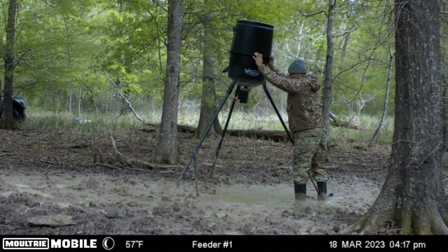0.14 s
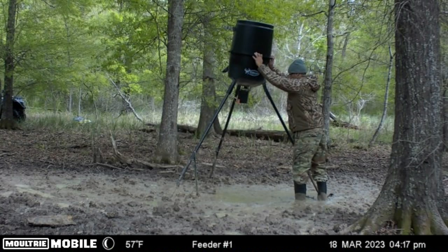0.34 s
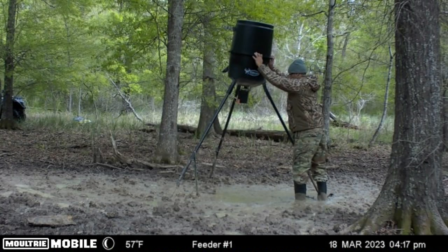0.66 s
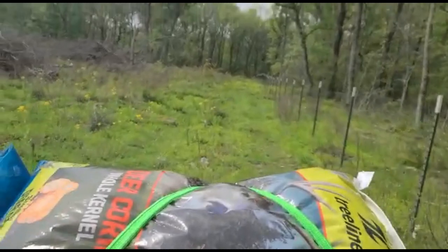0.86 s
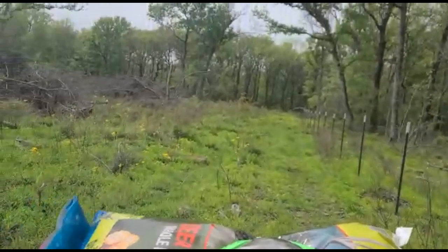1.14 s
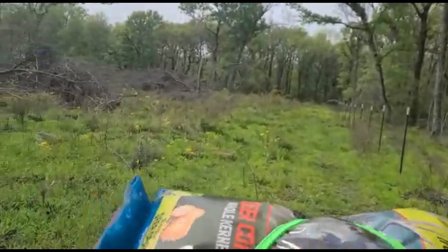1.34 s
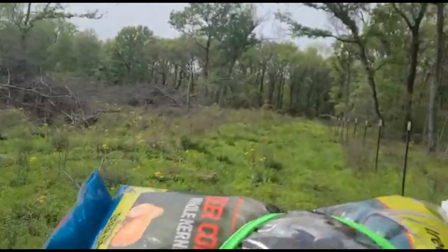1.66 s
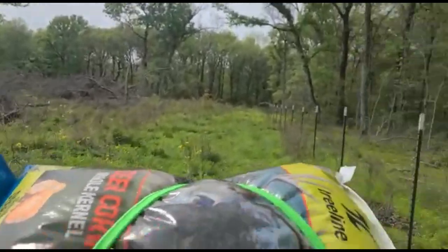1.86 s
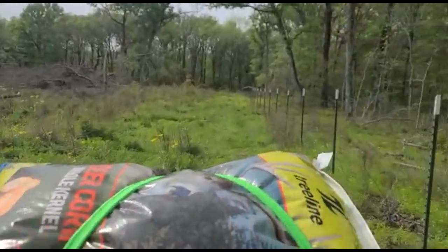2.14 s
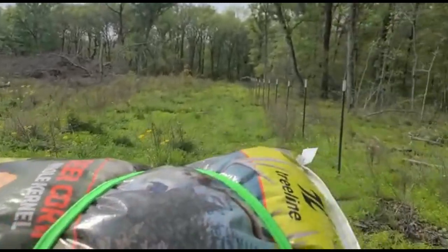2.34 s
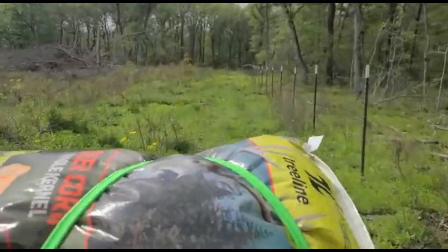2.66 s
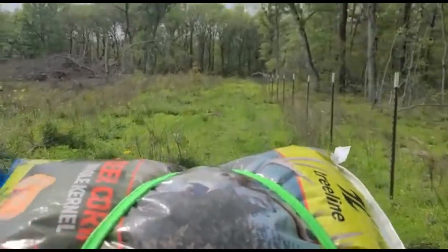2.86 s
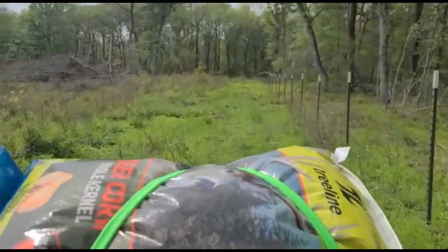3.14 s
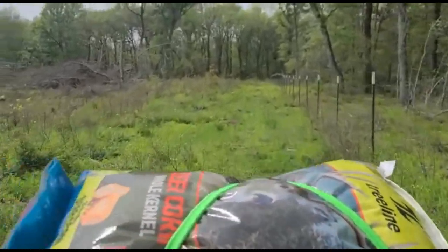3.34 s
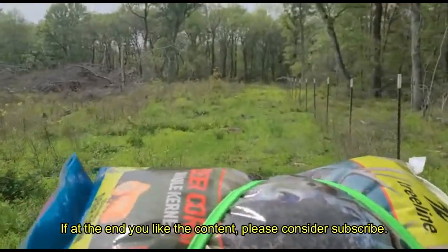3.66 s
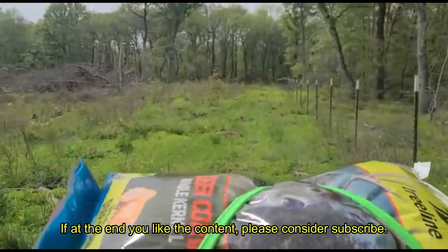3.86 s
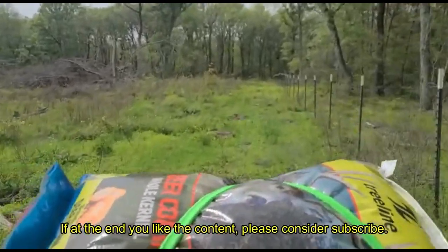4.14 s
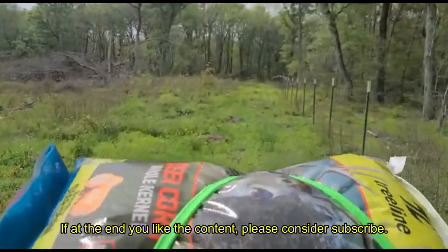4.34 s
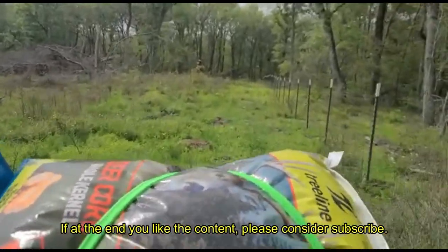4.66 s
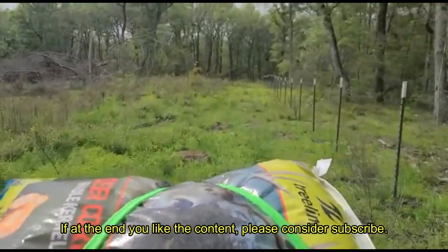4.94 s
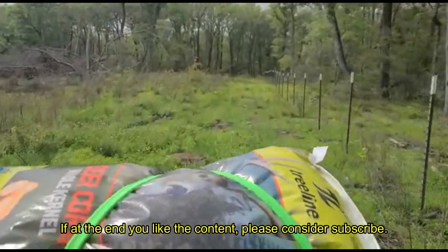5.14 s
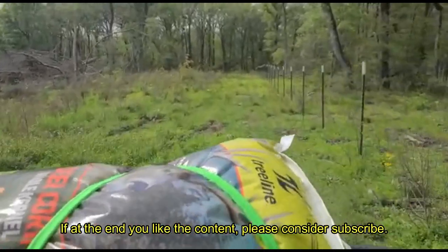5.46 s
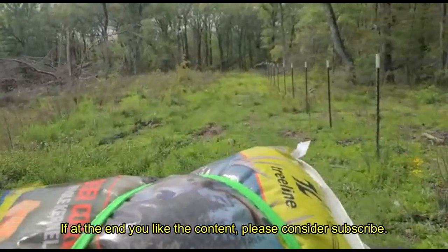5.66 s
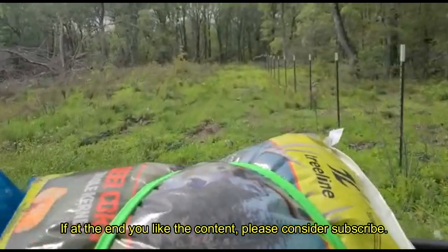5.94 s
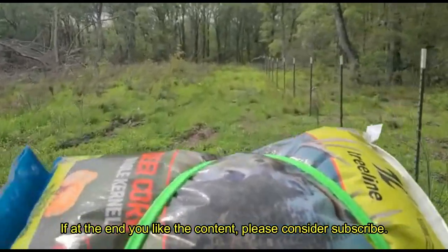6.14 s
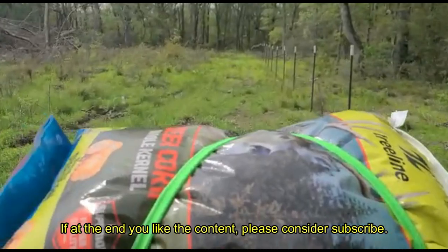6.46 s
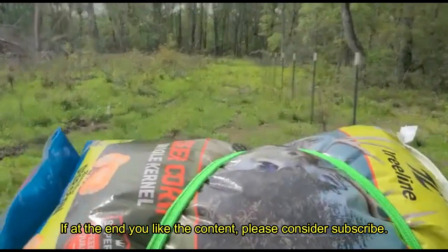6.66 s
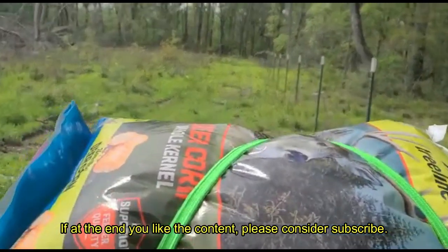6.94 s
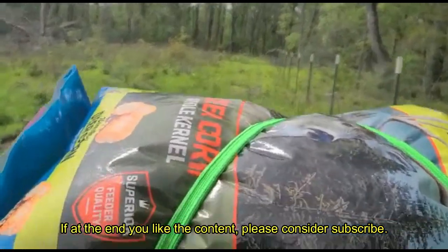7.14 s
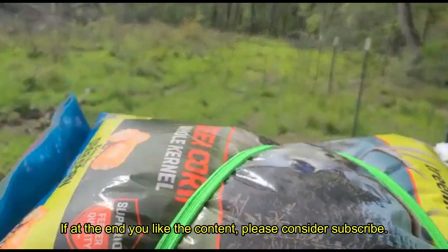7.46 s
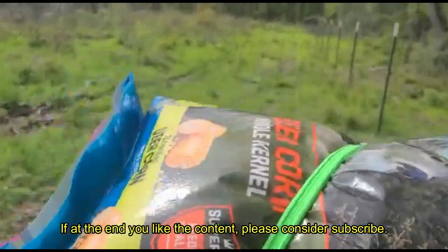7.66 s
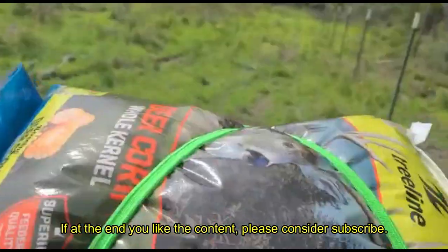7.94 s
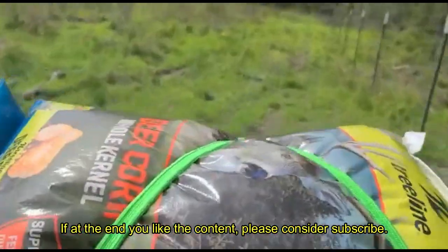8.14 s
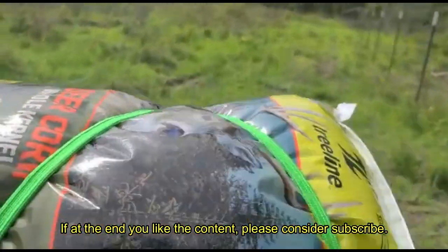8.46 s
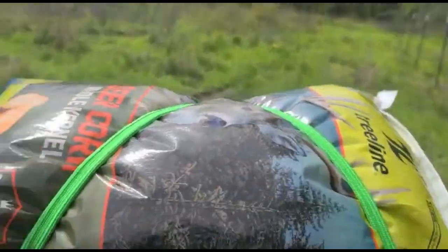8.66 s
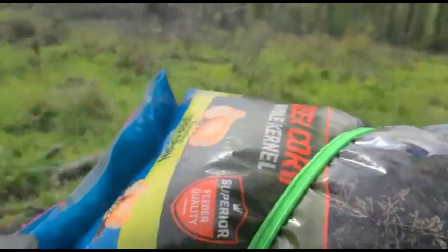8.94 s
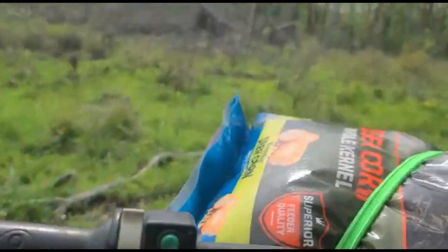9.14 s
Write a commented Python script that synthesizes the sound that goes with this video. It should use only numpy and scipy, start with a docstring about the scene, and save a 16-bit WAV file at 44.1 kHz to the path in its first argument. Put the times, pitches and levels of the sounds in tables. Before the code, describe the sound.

A brief silence is cut off by a steady two-cylinder motor driving slowly across a grassy field. The fast, deep exhaust putter flutters unevenly under mechanical rattle and soft hiss, holding almost constant speed. Muffled frame thuds come at intervals, with tiny plastic snaps early and late and one faint scuff midway. Close, dry outdoor sound from the rider's position, with treble leaning right.

```python
"""First comes silence, then the steady rattle of a small two-cylinder off-road vehicle cuts in abruptly.
It rolls over a grassy field, heard from the seat. Two click trains, half a cycle apart, are shaped into
exhaust tones that waver one by one. Noise that swells once a cycle makes the clatter and hiss; one knock a
cycle rings the block, and narrow bands of noise make the gears whine. The load ticks and scuffs, and the
frame thuds over bumps: short bursts of noise."""
import sys
import numpy as np
from scipy import signal
from scipy.fft import rfft, irfft, next_fast_len
from scipy.io import wavfile
from scipy.ndimage import uniform_filter1d

SR = 44100
rng = np.random.default_rng(int(sys.argv[2]) if len(sys.argv) > 2 else 0)


def master(y):
    """Save y as 16-bit WAV."""
    cut = np.clip(np.atleast_2d(y).T, -1, 1)
    pcm = np.round(cut * 32767)  # scale
    wavfile.write(sys.argv[1], SR, pcm.astype(np.int16))


N = 410571

START_S, TOP_HZ = 0.7765, 15800  # end of the silence, upper limit of the sound
CYCLE_HZ = 37.2  # engine cycle rate that places the exhaust tone colour
TREMBLE_HZ, TREMBLE_TOP_HZ = .07, 9  # rms wander of the cycle rate, and its fastest rate
WAVER_TOP_HZ = 14  # fastest wavering of any level
RING_WAVER_DB, MACHINE_WAVER_DB = 1.5, 0.25  # rms: ring and whine; clatter and hiss
SWELL_SHARE = .2  # dB of swell near 75 Hz per dB of dropout near 225 Hz

# Tone colour of the exhaust: (multiple of the cycle rate, relative level [dB])
EXHAUST_TONES = [(1, -5), (2, 1), (3, -15), (4, 0), (5, -26), (6, -.5), (7, -13), (8, -3.5), (9, -13.5),
                 (10, -2.5), (11, -13.5), (12, -13), (13, -26), (14, -27), (15, -27), (16, -19),
                 (17, -21.5), (18, -19.5), (19, -22), (20, -22.5), (21, -25), (22, -26)]
# Colour of the clatter of block, gears and tyres: (frequency [Hz], relative level per Hz [dB])
CLATTER_COLOUR = [(25, -22.5), (60, -4.5), (130, -7), (250, -1), (480, -6), (800, -11), (1200, -13),
                  (1700, -16), (2300, -26), (3200, -29), (4000, -37), (5000, -41.5), (6000, -51.5),
                  (7000, -63)]
# Colour of the hiss: (frequency [Hz], relative level per Hz [dB])
HISS_COLOUR = [(5500, -31.5), (7200, -21), (8500, -5), (10000, -4), (11800, 0.5), (13000, -3.5),
               (15500, -4)]
# How far noise rises and falls around its middle in each cycle: (frequency [Hz], swing [dB])
THROB_SWING = [(300, 3), (650, -1.5), (1050, -1), (1600, 2.5), (2600, 0.6), (5000, 1.5), (11000, 2)]
# Resonances of the block, rung by the knock: (frequency [Hz], width [Hz], level before the ring level [dB])
BLOCK_RINGS = [(617, 130, -10), (1160, 190, -15), (1390.5, 83, -1), (1760, 220, -12)]
# Fuzzy gear whines: (frequency [Hz], width [Hz], level before the whine level [dB])
GEAR_WHINES = [(2795, 28, -4), (2870, 28, -6), (3093, 50, -9.5), (4950, 73, -21)]
# How alike the noise is on both sides: (frequency [Hz], likeness [0 to 1])
SIDE_LIKENESS = [(60, 0.93), (200, 0.84), (500, 0.6), (1200, 0.35), (2500, 0.3), (5000, 0.28), (15000, .2)]
# Loudness difference of the two sides: (frequency [Hz], left minus right [dB])
SIDE_LEVEL = [(60, -0.3), (150, 0.4), (380, -2), (950, -5.0), (2380, -9), (5980, -9.5), (15000, -9)]
# Phase difference of the two sides: (frequency [Hz], lead of the left [rad])
SIDE_PHASE = [(70, -0.05), (150, -0.28), (300, 0.8), (400, -1.28), (600, -1), (950, -2.5), (1380, -0.54),
              (2070, 1.36), (2840, -1.7), (5000, -1.6)]
# Ticks of the load: (time [s], gain above 8 kHz [dB], gain near 5 kHz [dB], body near 2 kHz [dB])
LOAD_TICKS = [(2.207, -38, -33, -27.5), (2.2244, -49, -50, -45.5), (2.277, -45, -48, -42),
              (2.3597, -52, -49, -42), (5.5991, -57, -54, -49), (7.3308, -54, -45, -45),
              (7.6917, -47, -44, -48), (7.711, -53, -52, -50.5), (7.7557, -48, -41, -41.5),
              (7.8193, -57, -58, -49), (7.9485, -48, -39, -46), (8.0012, -54, -53, -43)]
# One scuff of the load: (start [s], length [s], rub [dB], squeak frequency [Hz], squeak [dB])
LOAD_SCUFF = (4.232, .05, -59, 9400, -65)
# Thuds of the frame over bumps: (time [s], approximate peak [dB])
FRAME_THUDS = [(1.787, -21.5), (2.004, -26), (2.247, -27), (3.113, -27.5), (4.557, -23.5), (5.569, -38.5),
               (6.111, -22.5), (6.246, -14.5), (6.677, -30), (8.753, -27.5)]
# The silencer holds higher tones back longer: (lag per Hz [s], up to [Hz], turn of the pulse [rad])
SILENCER_LAG = (6.35e-5, 400, 1.8)
# Engine speed: (time [s], engine cycles per second [Hz])
ENGINE_SPEED = [(.78, 36.8), (1.0, 37.4), (1.29, 36.75), (1.49, 37.75), (1.73, 37.45), (1.94, 36.5),
                (2.13, 36.95), (2.5, 36.8), (2.72, 37.4), (2.87, 37.35), (3.0, 37.1), (3.23, 36.8),
                (3.47, 37.7), (3.6, 37.45), (3.9, 37.3), (4.35, 37.75), (4.62, 37.05), (4.8, 36.8),
                (5.12, 37.8), (5.33, 37.3), (5.45, 37.5), (5.87, 37.1), (6.0, 37.75), (6.15, 37.75),
                (6.43, 36.95), (6.55, 37.25), (6.84, 37.35), (6.94, 36.85), (7.17, 36.95), (7.38, 36.2),
                (7.6, 36.9), (7.8, 37.8), (8.03, 36.5), (8.36, 37.35), (8.51, 36.6), (8.62, 37.3),
                (9.0, 37.15), (9.1, 36.6), (9.31, 36.7)]
# Exhaust bands: (from [Hz], to [Hz], level [dB], rms waver [share of the tone])
EXHAUST_BANDS = [(0, 55, -36, .04), (55, 128, -28, 0.11), (136, 188, -29.5, 0.081), (190, 275, -30.5, 0.17),
                 (269, 316, -32, .12), (323.5, 353, -46, 0.19), (348, 465, -33, .12), (465, 5000, -45, .2)]
# Slow drift of the exhaust bands, near 37, 75, 150, 225, 300, 335, 370 and above 465 Hz:
# (time [s], then one change for each band [dB])
BAND_DRIFT = [(.8, 0, -0.71, 0, -1, -1, 0.5, -2.5, -1), (1.2, -.5, 1, -0.5, 0, 0, -6, 0, -2),
              (1.7, .3, 0, 1.6, 0.5, 0, -3, 0, 1.5), (2.3, 0.068, -0.66, -1.5, 0.5, -0.5, 6, 1, 2),
              (3, 0, -0.48, .8, 1, 0, -6, 2.5, 1), (3.7, .3, 0, 1, .3, -0.3, -7, 1, -2),
              (4.3, -0.34, -.3, 0.9, .5, .3, 0, 2.5, 0.5), (4.9, 0, -0.26, -0.5, 1, 0, 0, -0.5, 1),
              (5.3, 0, -.2, 0, -0.5, 1.5, -6, 0.8, 3), (5.8, .5, -0.14, -2.5, 2.5, .3, -5, 0.5, 2),
              (6.2, .3, -0.16, -0.5, 1.5, .5, 2, 1, 4), (6.9, -.8, -.3, .5, .5, -.5, 3, 0, 1.5),
              (7.35, -1, -1.5, -2.5, 1, -1.5, 4, 1.5, 1), (7.8, -.7, -0.56, 0.1, 1.5, -4, 12, 0.6, -2),
              (8.4, -.9, -1.8, .3, -1.5, -1.2, 10, 0.6, 3.5), (8.72, -1.2, 0.58, -3.3, 0.5, -3, 13, .5, 5),
              (9, -.3, -0.56, 1.8, -2, 0.5, 1, -2, -4), (9.3, -0.83, -0.46, 0, -1, -4.5, 0, -1, -7)]
# The band near 225 Hz dips briefly while the one near 75 Hz swells: (time [s], depth [dB], half length [s])
BAND_DROPOUTS = [(0.995, 6, 0.028), (1.506, 6.5, 0.024), (1.873, 6, 0.11), (2.63, 7, 0.027),
                 (3.323, 10.5, 0.038), (3.452, 4, 0.017), (3.65, 6.5, 0.028), (4.04, 5, 0.036),
                 (4.172, 8, 0.023), (4.263, 5, 0.027), (4.796, 10.5, .015), (4.978, 7.5, .015),
                 (5.06, 7.5, .02), (5.188, 5, 0.037), (5.528, 13, .025), (5.73, 8, 0.029),
                 (6.014, 9.5, 0.033), (6.175, 8, 0.018), (6.33, 11, 0.023), (7.338, 15.5, 0.056),
                 (7.591, 6.5, 0.027), (7.713, 5.5, 0.023), (8.755, 6, 0.047), (8.93, 16, .035),
                 (9.052, 7, .03)]
# Slow levels: (time [s], clatter [dB], ring of the block [dB], gear whine [dB], hiss [dB])
MACHINE_LEVELS = [(.8, -34, -48.5, -55, -64), (1.3, -34.5, -46.5, -60, -66.5),
                  (1.67, -34, -46.5, -57.5, -64.5), (2.1, -34, -47, -56.5, -64.5),
                  (2.9, -34.5, -47, -59.5, -65), (3.3, -34.5, -49.5, -58, -65),
                  (3.7, -34.5, -46, -55, -65.2), (4.6, -34, -49.5, -56, -65.2),
                  (5.3, -33.5, -48, -62.5, -65.6), (6.1, -33.5, -53, -61, -65),
                  (6.5, -34.7, -47.5, -57, -65.8), (7.2, -34.5, -45.5, -55, -64.5),
                  (7.55, -34, -45.5, -58.5, -64), (7.9, -34.5, -51.5, -62, -64),
                  (8.5, -35, -53.5, -62.5, -65), (8.8, -34.5, -44, -60, -64.4),
                  (9.05, -34, -45.5, -53, -63), (9.3, -34, -48.5, -62, -65.5)]


def gain_of(db):
    """Turns decibels into a plain multiplier."""
    return 10 ** (np.asarray(db) / 20)


def evened(x):
    """Scales a sound to an rms of 1."""
    return x / np.sqrt(np.mean(x ** 2) + 1e-20)


def read(points, hz):
    """Reads a frequency table between its points, along a logarithmic pitch scale."""
    f, value = np.transpose(points)
    return np.interp(np.log(hz + 1), np.log(f + 1), value)


def curves(table):
    """Gives the columns of a time table at every sample."""
    s, *columns = np.transpose(table)
    return [np.interp(np.arange(N) / SR, s, c) for c in columns]


def chance(top_hz, count=1):
    """Random wandering of rms 1: a sum of slow sines from 2 Hz up to top_hz."""
    hz = np.geomspace(2, top_hz, 24)
    t = np.arange(0, N + 99, 100) / SR
    phase = rng.random((count, 24))  # in cycles, from 0 to 1
    rows = np.sin(2 * np.pi * (hz * t[:, None, None] + phase)).sum(axis=2).T
    return np.array([np.interp(np.arange(N) / SR, t, evened(row)) for row in rows])


def band(x, lo_hz, hi_hz):
    """Keeps only the part of x between two frequencies."""
    sos = signal.butter(2, [lo_hz, min(hi_hz, .45 * SR)], "band", fs=SR, output="sos")
    return signal.sosfilt(sos, x)


def resonate(x, hz, width):
    """A resonance of gain 1 at its centre; a narrow one rings longer."""
    r = np.exp(-np.pi * width / SR)
    return 2 * signal.lfilter([1 - r], [1, -r * np.exp(2j * np.pi * hz / SR)], x).real


def resonate_twice(x, hz, width):
    """Two equal resonances in a row, set to rms 1."""
    return evened(resonate(resonate(x, hz, width), hz, width))


def causal(x, points, size=16384):
    """Colours x by a spectrum, with the phase of a system that answers at once."""
    cep = irfft(np.log(gain_of(read(points, np.fft.rfftfreq(size, 1 / SR)))))
    # folding the log spectrum's echo onto positive times gives that phase
    cep[1:size // 2] *= 2
    cep[size // 2 + 1:] = 0
    answer = irfft(np.exp(rfft(cep)))[:size // 2]
    return signal.oaconvolve(x, answer)[:N]


def blows(turns, uneven_db, slip_s):
    """One click each time turns passes a whole number, a little uneven in size and time."""
    at = np.flatnonzero(np.diff(np.floor(turns)))
    size, slip = rng.standard_normal((len(at), 2)).T
    slipped = at + np.round(slip * slip_s * SR).astype(int)
    train = np.zeros(N)
    train[np.clip(slipped, 0, N - 1)] = gain_of(uneven_db * size)
    return train


def throbbing(points, cycles, lead, patchy_db):
    """Clatter or hiss: patchy two-sided noise that swells once in every engine cycle."""
    hop = 64
    frames, hz = N // hop + 5, np.fft.rfftfreq(256, 1 / SR)
    a, b, c, d, patches = rng.standard_normal((frames, 129, 5)).T
    # smooth over 3 frequency steps and 60 time steps
    patches = evened(uniform_filter1d(uniform_filter1d(patches, 3, 0), 60, 1))
    frame_cycles = cycles[np.minimum(np.arange(frames) * hop, N - 1)]
    beat = np.cos(2 * np.pi * (frame_cycles + lead))  # lead in cycles
    same = np.clip(read(SIDE_LIKENESS, hz), -1, 1)[:, None]
    left = a + 1j * b
    right = same * left + np.sqrt(1 - same ** 2) * (c + 1j * d)
    swell_db = read(THROB_SWING, hz)[:, None] * beat + patchy_db * patches
    noise = signal.istft(np.array([left, right]) * gain_of(swell_db), nperseg=256, noverlap=192)[1][:, :N]
    colour = points + [(21000, points[-1][1])]
    return evened(np.array([causal(side, colour) for side in noise]))


def gears():
    """Faint fuzzy whines: noise, partly shared by both sides, through narrow resonances."""
    shared, *own = rng.standard_normal((3, N))
    noise = shared + np.array(own)
    return sum(gain_of(db) * resonate_twice(noise, hz, w) for hz, w, db in GEAR_WHINES)


def load_ticks(out):
    """Adds short snaps of plastic: fading noise bursts with a fading 1870 Hz body."""
    t = np.arange(2200) / SR
    for s, high_db, low_db, body_db in LOAD_TICKS:
        noise = rng.standard_normal((2, len(t)))
        bright = gain_of(high_db) * band(noise, 8000, 16000)
        dull = gain_of(low_db) * band(noise, 4500, 6000)
        snap = gain_of(-60 * t / .028) * (bright + dull)  # falls 60 dB in 28 ms
        body = gain_of(body_db - 60 * t / 0.037) * np.sin(2 * np.pi * 1870 * t)
        out[:, round(s * SR):][:, :len(t)] += snap + body


def frame_thuds(out):
    """Adds dull thuds of the frame: low noise with a soft start and a quick fade."""
    t = np.arange(2200) / SR
    for s, peak_db in FRAME_THUDS:
        noise = rng.standard_normal(len(t))
        thud = evened(band(band(noise, 250, 1000), 250, 1000)) * np.minimum(t / 0.0022, 1)
        # the noise rms sits 9 dB below the peak
        out[:, round(s * SR):][:, :len(t)] += gain_of(peak_db - 9.0 - 60 * t / 0.065) * thud


def load_scuff(out):
    """Adds one rub of the load: broad noise, with a narrow band of it as the squeak."""
    s, length, rub_db, squeak_hz, squeak_db = LOAD_SCUFF
    noise = rng.standard_normal((2, round(length * SR)))
    rub = gain_of(rub_db) * evened(band(noise, 2800, 9000))
    squeak = gain_of(squeak_db) * evened(resonate(noise, squeak_hz, 300))
    fade = signal.windows.tukey(noise.shape[1], .4)
    out[:, round(s * SR):][:, :noise.shape[1]] += (rub + squeak) * fade


def load():
    """The loose sounds of the ride, added together on two sides."""
    out = np.zeros((2, N + SR))
    load_ticks(out)
    frame_thuds(out)
    load_scuff(out)
    return out[:, :N]


def knocks(cycles):
    """One knock a cycle rings the block: a clean blow inside a soft ragged scrape."""
    u = np.arange(1500) / 170.0  # time in steps of 170 samples
    shared, *own = rng.standard_normal((3, N))
    swell = signal.oaconvolve(blows(cycles + 0.28, 1.3, 0.0018), u * np.exp(-u))[:N]
    scrape = swell * (shared + 2.0 * np.array(own))
    knock = 0.45 * evened(scrape) + evened(blows(cycles + .22, 0.95, .00004))
    return sum(gain_of(db) * resonate_twice(knock, hz, w) for hz, w, db in BLOCK_RINGS)


def silenced(x, points):
    """Colours pulses by the pipe and smears each into a rising sweep."""
    lag, top_hz, turn = SILENCER_LAG
    size = next_fast_len(N + SR)
    hz = np.fft.rfftfreq(size, 1 / SR)
    low = np.minimum(hz, top_hz)
    sweep = np.exp(1j * (turn - np.pi * lag * low * (2 * hz - low)))
    return irfft(rfft(x, size) * gain_of(read(points, hz)) * sweep, size)[:N]


def tone_levels():
    """Gain of every exhaust band: slow drift, random wavering, and the dropouts."""
    t = np.arange(N) / SR
    drop_db = sum(db * np.exp(-((t - s) / half) ** 2) for s, db, half in BAND_DROPOUTS)
    drift_db = np.array(curves(BAND_DRIFT))
    drift_db[1] += SWELL_SHARE * drop_db  # near 75 Hz
    drift_db[3] -= drop_db  # near 225 Hz
    level_db, share = np.transpose(EXHAUST_BANDS)[2:, :, None]
    return gain_of(level_db + drift_db) * (1 + share * chance(WAVER_TOP_HZ, count=len(EXHAUST_BANDS)))


def exhaust(cycles):
    """What both cylinders share makes the even multiples, what tells them apart the odd ones."""
    first = blows(cycles, 0.086, .0001)
    second = blows(cycles + .5, 0.21, .0001)
    pipe = [(k * CYCLE_HZ, db) for k, db in EXHAUST_TONES]
    # the colour below and above the listed tones: (frequency [Hz], relative level [dB])
    below = [(9.3, -45)]
    above = [(950, -32.5), (1100, -33.5), (1500, -45.5), (3000, -87.5)]
    size = next_fast_len(N)
    even = rfft(silenced(first + second, below + pipe[1::2] + above), size)
    odd = rfft(silenced(first - second, below + pipe[::2] + above), size)
    hz, out = np.fft.rfftfreq(size, 1 / SR), np.zeros(N)
    for (lo, hi, *_), gain in zip(EXHAUST_BANDS, tone_levels()):  # each band swells and sags by itself
        part = (hz >= lo) * (hz < hi)
        out += gain * evened(irfft((even + odd) * part, size)[:N])
    return out


def spread(x):
    """Places the sound on two sides: the left is shaded from the treble and has another phase."""
    size = next_fast_len(N + 999)
    hz = np.fft.rfftfreq(size, 1 / SR)
    side = np.array([[1], [-1]])  # each side takes half of the difference
    level = gain_of(side * read(SIDE_LEVEL, hz) / 2)
    phase = np.exp(1j * side * read(SIDE_PHASE, hz) / 2)
    return irfft(rfft(x, size) * level * phase, size)[:, :N]


def scene():
    """Drives every engine sound from one running count of cycles and adds the load."""
    speed_hz = curves(ENGINE_SPEED)[0] + TREMBLE_HZ * chance(TREMBLE_TOP_HZ)[0]
    cycles = np.cumsum(speed_hz) / SR
    waver_db = np.array([MACHINE_WAVER_DB, RING_WAVER_DB, RING_WAVER_DB, MACHINE_WAVER_DB])[:, None]
    levels_db = curves(MACHINE_LEVELS) + waver_db * chance(WAVER_TOP_HZ, count=4)
    clatter_gain, ring_gain, whine_gain, hiss_gain = gain_of(levels_db)
    hiss = hiss_gain * throbbing(HISS_COLOUR, cycles, -0.14, 1.2)
    clatter = clatter_gain * throbbing(CLATTER_COLOUR, cycles, 0.08, 1.45)
    whine = whine_gain * gears()
    ring = ring_gain * knocks(cycles)
    return spread(hiss + clatter + whine + load() + ring + exhaust(cycles))


def record(dry):
    """Silence until the sound cuts in within half a millisecond; then the treble limit."""
    cut = dry * np.clip((np.arange(N) / SR - START_S) * 2000, 0, 1)
    low_pass = signal.firwin(511, TOP_HZ, window=("kaiser", 9), fs=SR)
    return signal.oaconvolve(cut, low_pass[None], "same")


dry = scene()
out = record(dry)
master(out)
```